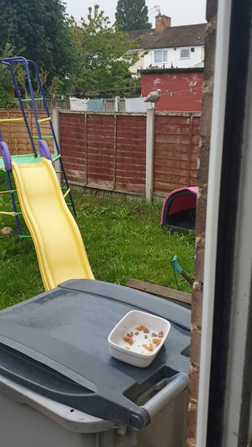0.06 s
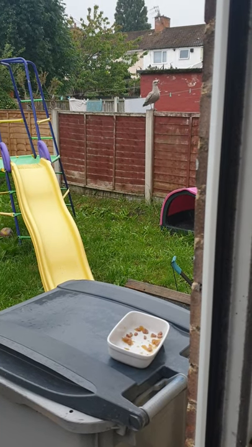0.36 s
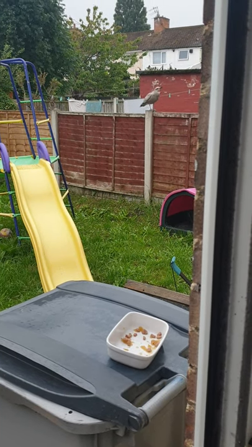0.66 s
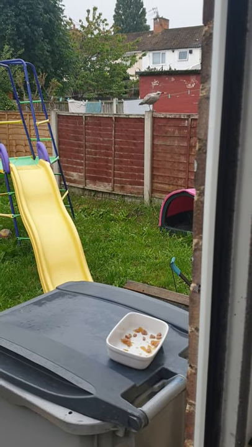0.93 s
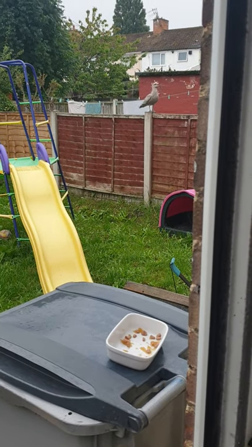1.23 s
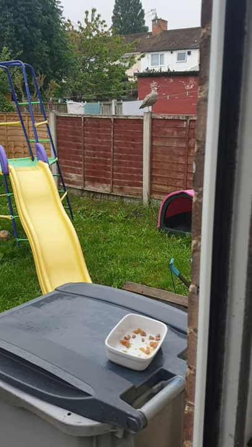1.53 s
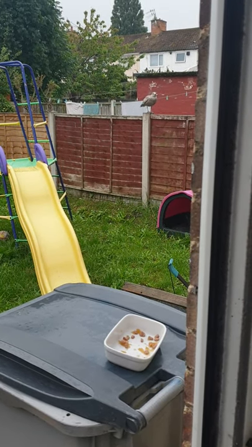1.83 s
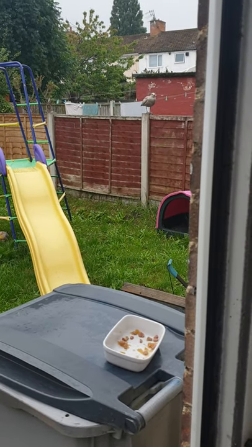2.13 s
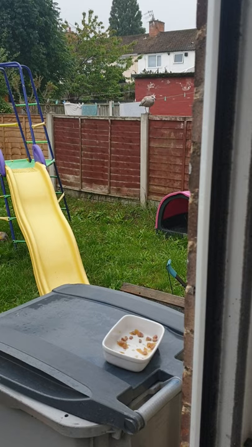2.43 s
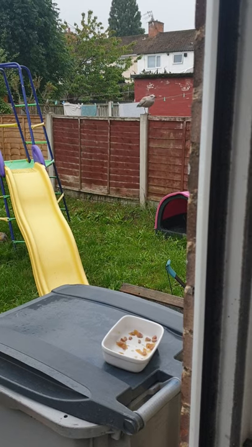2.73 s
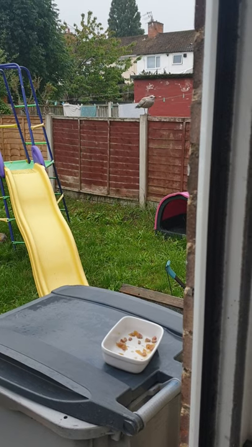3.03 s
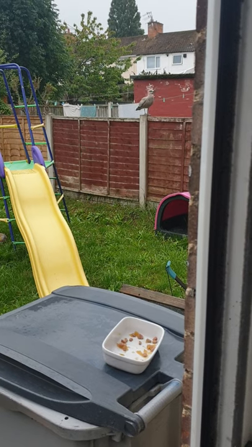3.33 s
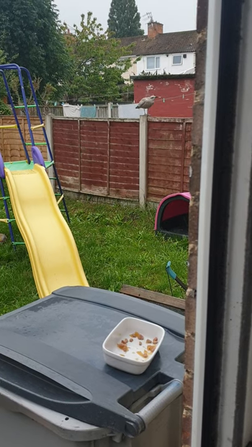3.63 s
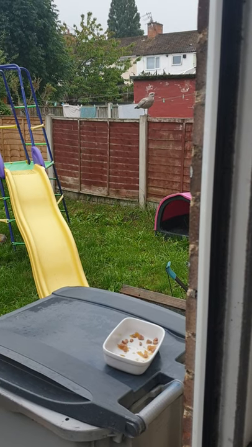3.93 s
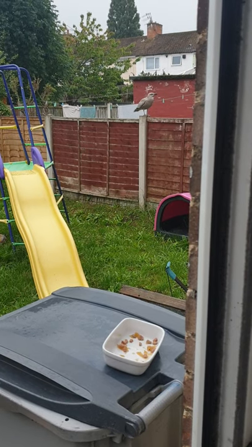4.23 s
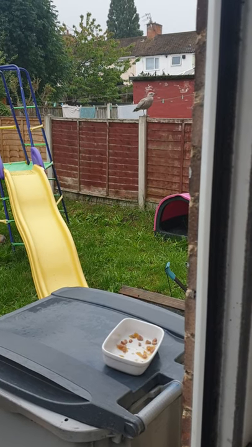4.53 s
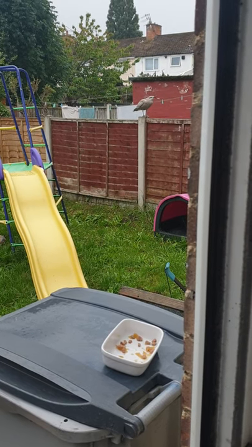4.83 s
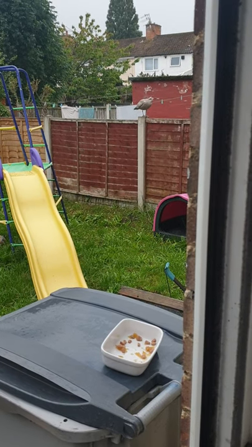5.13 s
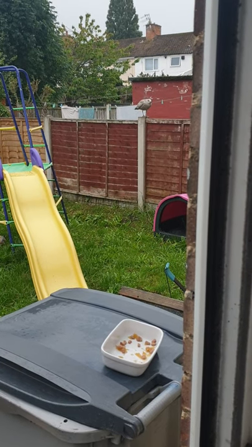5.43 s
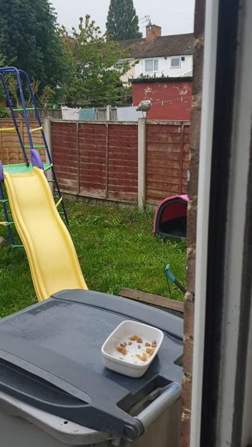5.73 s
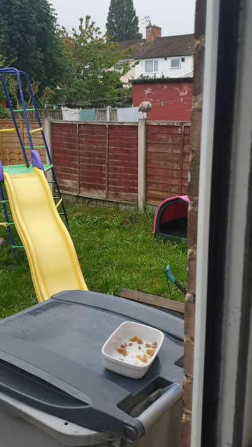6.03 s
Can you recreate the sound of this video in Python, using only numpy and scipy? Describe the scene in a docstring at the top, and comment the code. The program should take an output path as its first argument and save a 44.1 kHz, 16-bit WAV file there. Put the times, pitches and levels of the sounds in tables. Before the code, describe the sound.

In a back garden, another gull's short hoarse yelps open the scene as a young gull close by starts its squeaks and drawn-out, piercing whistles. The whistles repeat every second or so, and the other gull rasps and yelps once more near the end. Heard through a phone in a doorway, with slight wall echoes, soft wind rumble, a light breeze in trees, far birds and distant roads.

```python
"""A young gull on a garden fence, close by, begs with long thin whistles, each led in by a lower squeak:
two voices from the vibrating membranes of its syrinx, with breath hissing through the open bill.
Another gull, out of sight, breaks in with rasps and yelps. Fences and house walls answer; farther off
are faint birds, a breeze in the trees and the murmur of traffic. Heard from a phone held in a doorway,
wind rumbling more on its left microphone, the right one shaded from the treble."""
import sys
import numpy as np
from scipy import signal
from scipy.fft import rfft, irfft, next_fast_len
from scipy.io import wavfile
from scipy.ndimage import uniform_filter1d, map_coordinates

SR = 44100
rng = np.random.default_rng(int(sys.argv[2]) if len(sys.argv) > 2 else 0)


def dump_mix(stems):
    """Bounce the given channels to the path in sys.argv[1] as a 16-bit WAV at rate SR."""
    frames = np.atleast_2d(stems).T  # one column per channel
    limited = np.clip(frames, -1, 1)  # hard clip at full scale
    pcm = np.round(limited * 32767).astype(np.int16)
    wavfile.write(sys.argv[1], SR, pcm)


N = 276066


def amp(db):
    """Decibels to gain."""
    return 10 ** (np.asarray(db) / 20)


def unit(x):
    """Scale to rms 1."""
    return x / np.sqrt(np.mean(x ** 2) + 1e-20)


def along(points, hz):
    """Read (f/Hz, value) points on a log frequency axis."""
    f, v = np.transpose(points)
    return np.interp(np.log(hz + 1), np.log(f + 1), v)


def curves(rows):
    """One value per sample for each column after t/s."""
    times, *columns = np.transpose(rows)
    return [np.interp(np.arange(N) / SR, times, column) for column in columns]


def wobble(rate, size=N):
    """A smooth random curve with rate knots a second."""
    return map_coordinates(rng.standard_normal(size=1024), [np.arange(size) * rate / SR], mode="mirror")


def filtered(x, response):
    """Filter x by a gain given as a function of f/Hz."""
    size = next_fast_len(N + 8192)
    return irfft(rfft(x, size) * response(np.fft.rfftfreq(size, 1 / SR)), size)[..., :N]


def from_right(x, lag):
    """Sound from the right reaches the left microphone lag seconds later (negative: from the left)."""
    return filtered(x, lambda hz: np.exp(np.array([[-1j], [1j]]) * np.pi * hz * lag))


def rush(spectrum, patchy_db):
    """Diffuse noise of rms 1 in patches of random gain, most alike at the two microphones in the bass."""
    # likeness of left and right: f/Hz, correlation
    likeness = [(60, 0.99), (200, 0.99), (500, 0.52), (1000, 0.75), (2500, .25), (8000, 0.15)]
    bins = signal.stft(rng.standard_normal((2, N)), nperseg=512)[2]
    patches = uniform_filter1d(rng.standard_normal(bins.shape[1:]), size=5, axis=0)
    patches = uniform_filter1d(patches, size=16, axis=1)
    pair = signal.istft(bins * amp(patchy_db * unit(patches)), nperseg=512)[1][:, :N]

    def mid_side_gains(hz):
        width = np.arccos(np.clip(along(likeness, hz), -1, 1)) / 2
        return amp(along(spectrum, hz)) * [np.cos(width), np.sin(width)]

    mid, side = filtered(pair, mid_side_gains)
    return unit(np.array([mid + side, mid - side]))


def traffic_and_wind():
    """Distant roads murmur a little to the left; wind rumbles, more on the left microphone."""
    # spectrum of the roads: f/Hz, level/dB
    road_spectrum = [(20, -27), (40, -7), (60, -3.5), (80, -5), (105, -15), (220, -14), (520, -17.5),
                     (800, -10), (1000, -7.5), (1250, -15.5), (1600, -22.5), (3200, -40.5), (7000, -61),
                     (15000, -44)]
    # spectrum of the wind rumble: f/Hz, level/dB
    wind_spectrum = [(20, -27.5), (45, -4), (70, -3), (130, -14.5), (300, -22.5), (600, -23.5),
                     (1500, -56.5)]
    # slow rise and fall: t/s, relative wind level/dB, road level/dB
    levels = [(0, -73.5, -49), (.6, -59, -53.5), (2.4, -66, -53), (3.9, -60.5, -52), (4.4, -55, -51),
              (4.8, -52, -51.5), (5.2, -57.5, -52), (6.26, -59.5, -52.5)]
    wind_db, road_db = curves(levels)
    roads = amp(road_db + 0.33 * wobble(4.4)) * from_right(rush(road_spectrum, patchy_db=1), lag=-0.00016)
    wind = amp(wind_db + 1.5 + 1.7 * wobble(5.5)) * rush(wind_spectrum, patchy_db=5)
    return roads + wind * amp([[3], [-3]])


def breeze():
    """Light gusts rustle the trees."""
    # spectrum of the leaves: f/Hz, level/dB
    rustle = [(900, -7.5), (1200, -4.5), (2000, -9.5), (3000, -30), (4700, -16), (7500, -28),
              (11500, -24.5), (15500, -33)]
    # gusts: t/s, relative level/dB
    gusts = [(0, -50), (.5, -67.5), (2.6, -80), (3.1, -66.5), (4.1, -72.5), (4.35, -54.5), (4.9, -58.5),
             (5.6, -71.5), (6.26, -87)]
    return amp(curves(gusts)[0] - 1) * rush(rustle, patchy_db=2)


def garden(x, walls_db, tail_db, mean_delay_s, build_s=0.011, echoes=60):
    """Early echoes from fences and door frame beat against gliding notes; a diffuse tail follows."""
    # reverberation of the garden: f/Hz, time to fall 60 dB/s
    decay_times = [(500, .6), (2000, 0.41), (4000, 0.33), (8000, .36), (14000, .27)]
    size = SR * 3 // 4
    hz, t, bins = signal.stft(rng.standard_normal((2, size)), SR, nperseg=256)
    decay = amp(-60 * t / along(decay_times, hz)[:, None])
    tail = signal.istft(bins * decay * (1 - np.exp(-t / build_s)), SR, nperseg=256)[1]
    response = amp(tail_db) * tail / np.linalg.norm(tail[0])
    for side in response:
        delays = np.minimum(rng.exponential(mean_delay_s, echoes) * SR + 1, size - 1).astype(int)
        side[delays] += amp(walls_db) * rng.choice([-1, 1], echoes) / np.sqrt(echoes)
    return signal.fftconvolve(np.atleast_2d(x), response, axes=1)[:, :N]


def note(start, end, edge_s=0.0038):
    """Samples of one note, their times and a gate with soft edges."""
    at = np.arange(max(0, int((start - edge_s) * SR)), min(N, int((end + edge_s) * SR)))
    t = at / SR
    gate = np.clip(np.minimum(t - start, end - t) / edge_s + 1, 0, 1)
    return at, np.clip(t, start, end), np.sin(gate * np.pi / 2) ** 2


def swell(row, rise_db, fall_db, bend=1.1, settle=1.8):
    """A short note that peaks and fades while settling on its last pitch: samples, pitch, gain."""
    start, peak, end, first_hz, last_hz, db = row
    at, t, gate = note(start, end)
    before, after = np.interp(t, [start, peak], [1, 0]), np.interp(t, [peak, end], [0, 1])
    hz = last_hz + (first_hz - last_hz) * ((end - t) / (end - start)) ** settle
    return at, hz, gate * amp(db - rise_db * before ** bend - fall_db * after ** bend)


def syrinx(hz, harmonics_db, jitter, jitter_rate, shimmer):
    """A vibrating membrane: harmonics that tremble in pitch (jitter) and strength (shimmer)."""
    size = len(hz)
    phase = 2 * np.pi * np.cumsum(hz * (1 + jitter * wobble(jitter_rate, size))) / SR
    tone = sum(amp(db) * np.sin(k * phase) for k, db in enumerate(harmonics_db, 1))
    return tone * (1 + shimmer * wobble(jitter_rate / 2, size)) * np.sqrt(2 / (1 + shimmer ** 2))


def breath(strength):
    """Air hisses through the open bill."""
    # spectrum of the hiss: f/Hz, level/dB
    spectrum = [(1200, -21.5), (2450, -15), (2730, -5), (3050, -9), (3400, -12), (3700, 2.5), (4100, -5),
                (5700, -4.5), (7000, -13), (10500, -6), (12300, -9), (15500, -13)]
    return strength * unit(filtered(rng.standard_normal(N), lambda hz: amp(along(spectrum, hz))))


def far_birds():
    """Distant calls, smeared by the houses into wavering tones that differ at each microphone."""
    # calls: start t/s, peak t/s, end t/s, first f/Hz, last f/Hz, level/dB
    calls = [(0, .17, .48, 1134, 1160, -43.5), (1.054, 1.207, 1.4, 673, 670, -59),
             (2.751, 3.156, 3.4, 3190, 3120, -77), (4.22, 4.326, 4.55, 1170, 1190, -52)]
    out = np.zeros((2, N))
    for row in calls:
        at, hz, gain = swell(row, rise_db=9, fall_db=14)
        for side in out:
            side[at] += gain * syrinx(hz, [0], jitter=0.025, jitter_rate=300, shimmer=0.88)
    return out


def rasps(level_db=-2, breath_db=-24, flap_hz=310):
    """The hidden gull leads into a yelp: uneven flapping throws harsh sidebands around its voices."""
    # rasps: start t/s, peak t/s, end t/s, first f/Hz, last f/Hz, relative level/dB
    calls = [(-.02, .025, 0.076, 3260, 2994, -25.5), (-.02, 0, 0.043, 4550, 4130, -31),
             (4.935, 4.974, 4.995, 2740, 2700, -28.5), (4.959, 4.977, 5.02, 3265, 3225, -27.5),
             (5.012, 5.055, 5.097, 3097, 3042, -22), (5.062, 5.096, 5.1, 2760, 2540, -38)]
    voice, flow = np.zeros(N), np.zeros(N)
    for row in calls:
        at, hz, gain = swell(row, rise_db=6, fall_db=10)
        flap_rate = flap_hz * (1 + 0.37 * wobble(200, len(at)))
        flap = np.sin(2 * np.pi * np.cumsum(flap_rate) / SR)
        tone = syrinx(hz, [0, -26, -32], jitter=0.018, jitter_rate=1600, shimmer=0.35)
        voice[at] += gain * unit(tone * (1 + 0.6 * flap))
        flow[at] += gain
    return amp(level_db) * voice + breath(amp(breath_db) * flow)


def yelp_shape(row, attack_s=0.011, release_s=0.017, scoop=0.06, drop=0.19):
    """A yelp starts flat and weak, holds, then collapses: samples, pitch, gain, roughness."""
    start, end, middle_hz, glide, db, held_rough = row
    at, t, gate = note(start, end)
    opening, closing = np.exp((start - t) / attack_s), np.exp((t - end) / release_s)
    held_hz = middle_hz + glide * (t - (start + end) / 2)
    hz = held_hz * (1 - scoop * opening - drop * closing)
    gain = gate * amp(db - 11.5 * opening - 13 * closing)
    rough = np.clip(held_rough + 1.4 * opening + 0.81 * closing, 0, 1)
    return at, hz, gain, rough


def yelps(level_db=-2, breath_db=-21, dulling_db=2):
    """The hidden gull's arched calls: a strong second harmonic, hoarse and duller at both ends."""
    # yelps: start t/s, end t/s, middle f/Hz, glide/(Hz/s), relative level/dB, roughness 0-1
    calls = [(0.021, .218, 1985, -400, -26, 0.24), (0.524, 0.751, 1984, 340, -23, 0.09),
             (1.418, 1.656, 2013, -360, -26, 0.16), (5.196, 5.37, 1850, -720, -33.5, 0.5)]
    # harmonics from the first up: level/dB
    harmonics = [-18, -0.5, -13.5, -19.5, -16.5, -17.5, -25.5]
    voice, flow = np.zeros(N), np.zeros(N)
    for row in calls:
        at, hz, gain, rough = yelp_shape(row)
        waver = 1 + 0.003 * wobble(220, len(at))
        dulled = [db - dulling_db * rough * max(k - 2, 0) for k, db in enumerate(harmonics, 1)]
        voice[at] += gain * syrinx(hz * waver, dulled, jitter=0.033 * rough, jitter_rate=700, shimmer=rough)
        flow[at] += gain * rough
    return amp(level_db) * voice + breath(amp(breath_db) * flow)


def squeaks(level_db=-2, breath_db=-24, settle_s=0.03):
    """The young gull's lower voice starts hoarse and quickly settles: tone, breath strength."""
    # squeaks: start t/s, peak t/s, end t/s, first f/Hz, last f/Hz, relative level/dB
    calls = [(0.527, 0.596, .71, 3326, 3520, -31.5), (1.733, 1.769, 1.822, 3405, 3232, -22.5),
             (2.05, 2.057, 2.15, 3823, 3745, -50.5), (2.409, 2.431, 2.455, 3590, 3505, -49),
             (3.382, 3.457, 3.495, 3657, 3572, -31.5), (3.384, 3.406, 3.43, 3040, 2988, -53.5),
             (3.741, 3.925, 3.96, 3670, 3690, -54.5), (4.592, 4.607, 4.66, 3093, 3055, -37.5),
             (4.626, 4.677, 4.71, 3640, 3540, -36), (6.151, 6.212, 6.257, 3660, 3270, -25.5)]
    # harmonics from the first up: level/dB
    harmonics = [-1.5, -9, -14, -16]
    voice, flow = np.zeros(N), np.zeros(N)
    for row in calls:
        at, hz, gain = swell(row, rise_db=18.5, fall_db=18.5)
        hoarse = np.exp(-(at - at[0]) / SR / settle_s)
        voice[at] += gain * syrinx(hz, harmonics, 0.004 + 0.012 * hoarse, jitter_rate=770, shimmer=0.16)
        flow[at] += gain
    return amp(level_db) * voice, amp(breath_db) * flow


def register_jump(t, jump_s=0.0014):
    """The voice flips register: a quick smooth step from 0 to 1 at t = 0."""
    return (1 + np.tanh(t / jump_s)) / 2


def whistle_shape(row, climb_hz_per_s=2300, sag_hz_per_s=960, lead_s=0.022, overshoot_s=0.095):
    """A whistle leaps up, climbs to a crest, sags, breaks downward and droops: samples, pitch, gate."""
    start, crest, break_s, end, pitch_hz, overshoot_hz = row
    at, t, gate = note(start, end)
    climb = climb_hz_per_s * np.maximum(crest - t, 0) ** 2 / (crest - start)
    sag = sag_hz_per_s * np.maximum(t - crest, 0)
    overshoot = overshoot_hz * np.exp(-np.abs((t - crest) / overshoot_s) ** 3)
    lead_in = 0.885 ** register_jump(start + lead_s - t)
    lower_register = 0.897 ** register_jump(t - break_s)
    droop = 1 - 0.22 * np.exp((t - end) / 0.012)  # the air runs out
    return at, (pitch_hz - climb - sag + overshoot) * lead_in * lower_register * droop, gate


def whistles(level_db=-1, breath_db=-37, crack_jitter=0.023):
    """The nearly pure upper voice cracks as it jumps between registers: stereo tone, breath strength."""
    # whistles: start t/s, crest t/s, downward break t/s, end t/s, f/Hz, overshoot at the crest/Hz
    calls = [(0.622, 0.768, 1.17, 1.209, 5318, 370), (1.816, 1.84, 2.136, 2.43, 5275, 1),
             (3.456, 3.579, 3.943, 4.0, 5194, 0.5), (4.68, 4.839, 5.126, 5.314, 5159, -1),
             (6.227, 6.337, 6.1, 6.7, 5300, -5)]
    # each whistle's loudness and left-right balance, fluttering as echoes from the walls interfere:
    # t/s, relative level/dB, left-right/dB
    flutters = [
        [(0.64, -44.5, -1), (0.658, -36, 2.0), (0.792, -36, 0), (0.83, -35, -1), (0.89, -35.5, 2),
         (0.938, -49, 0), (0.974, -36.5, 4.5), (1.118, -50, 7), (1.18, -40, -2.5)],
        [(1.82, -41, 7), (1.852, -32, -3), (1.91, -38.5, 0.5), (1.946, -31.5, -3), (2.036, -34.5, 3),
         (2.084, -50, 2), (2.11, -39.5, 1.5), (2.346, -40.5, 5), (2.41, -47.5, 2)],
        [(3.46, -44, 2), (3.528, -33.5, -8.5), (3.624, -34, -7), (3.648, -44.5, -4), (3.66, -38, 1.5),
         (3.766, -46.5, 3), (3.832, -41.5, -4), (3.96, -40.5, 3), (3.98, -42.5, -1)],
        [(4.68, -46, 4), (4.72, -40.5, -5), (4.784, -40, 6), (4.822, -30, -12.5), (4.912, -38.5, 8.5),
         (5.0, -45.5, -1), (5.18, -36.5, -1), (5.324, -39, 9), (5.34, -54.5, -9)],
        [(6.228, -51, 20), (6.258, -36, 4)],
    ]
    # harmonics from the first up: level/dB
    harmonics = [0, -12.5, -17]
    voice, flow = np.zeros((2, N)), np.zeros(N)
    for row, flutter in zip(calls, flutters):
        at, hz, gate = whistle_shape(row)
        flutter_db, balance_db = (curve[at] for curve in curves(flutter))
        gain = gate * amp(flutter_db)
        glide_hz_per_s = uniform_filter1d(np.abs(np.gradient(hz)) * SR, size=600)
        cracking = np.clip((glide_hz_per_s - 5000) / 12000, 0, 1)
        waver = 1 + 0.0013 * wobble(70, len(at))
        jitter = 0.0026 + crack_jitter * cracking
        tone = syrinx(hz * waver, harmonics, jitter, jitter_rate=500, shimmer=0.08)
        voice[:, at] += gain * tone * amp([balance_db / 2, -balance_db / 2])
        flow[at] += gain
    return amp(level_db) * voice, amp(breath_db) * np.sqrt(flow)  # hiss grows more slowly than tone


def young_gull():
    """The bird on the fence: two voices and their breath leave through one bill."""
    upper, upper_breath = whistles()
    lower, lower_breath = squeaks()
    return upper + lower + breath(upper_breath + lower_breath)


def scene():
    """Both gulls and their echoes reach the microphones in the doorway, over the background."""
    # colour of the left microphone: f/Hz, level/dB
    left_mic = [(2000, 5), (4000, 1), (5300, 1), (7200, 6.5), (8700, -9.5), (10000, -3), (12000, 6.5),
                (15000, -7)]
    # colour of the shaded right microphone: f/Hz, level/dB
    right_mic = [(2000, 4), (4000, 0.5), (5300, 3.5), (7200, -15.5), (8700, -20.5), (10000, -15.5),
                 (12000, -13), (15000, -34)]
    near, hidden = young_gull(), rasps() + yelps()
    echoes = garden(near, walls_db=-6, tail_db=-7, mean_delay_s=0.016)
    # more of the hidden gull arrives by way of the walls
    echoes += garden(hidden, walls_db=-2, tail_db=-6.5, mean_delay_s=0.018)
    direct = from_right(near, lag=0.00005) + from_right(hidden, lag=-0.0001)
    gulls = filtered(direct + echoes, lambda hz: amp([along(left_mic, hz), along(right_mic, hz)]))
    return gulls + far_birds() + traffic_and_wind() + breeze()


def record(dry):
    """The phone keeps nothing above its band limit."""
    return filtered(dry, lambda hz: hz < 15700)


dry = scene()
out = record(dry)
dump_mix(out)
```